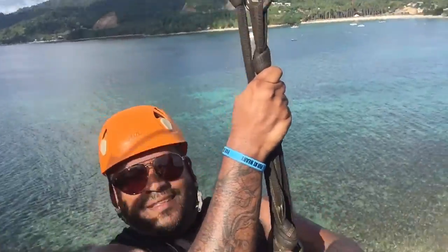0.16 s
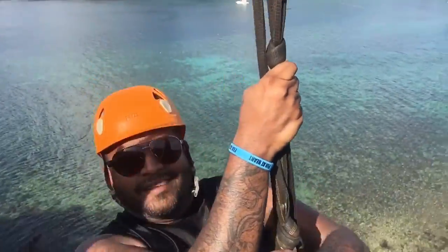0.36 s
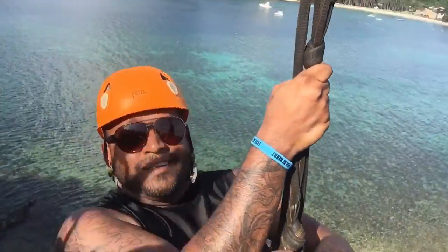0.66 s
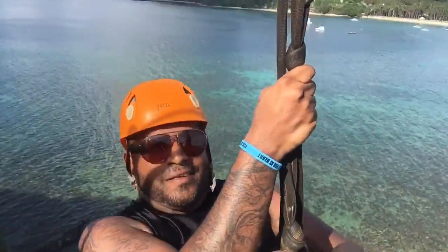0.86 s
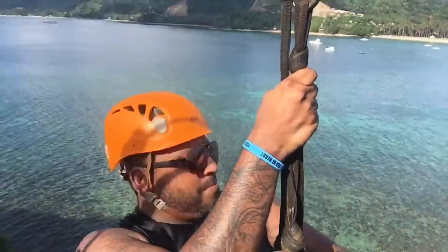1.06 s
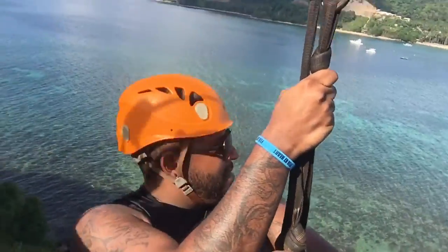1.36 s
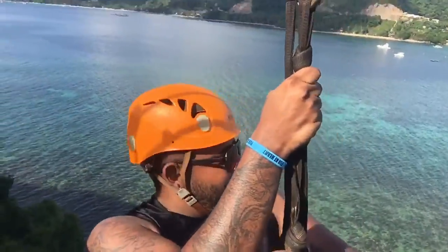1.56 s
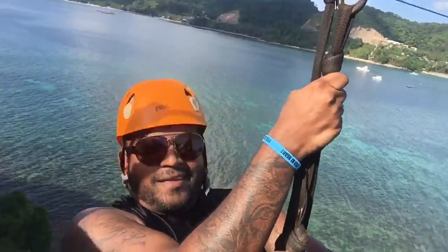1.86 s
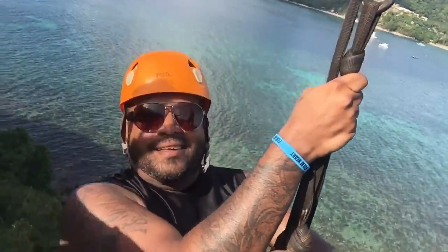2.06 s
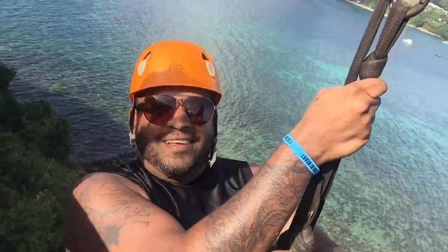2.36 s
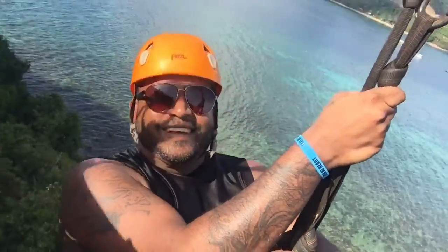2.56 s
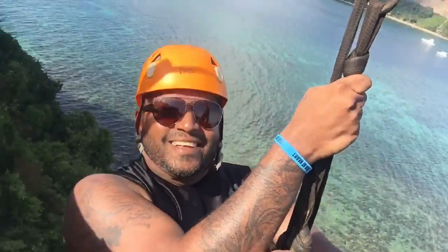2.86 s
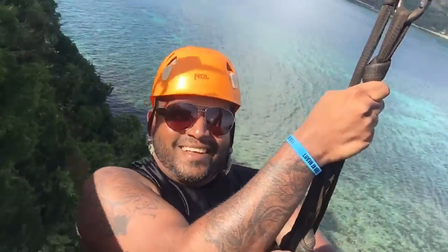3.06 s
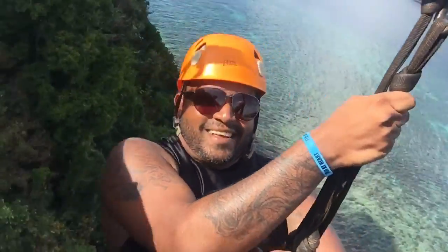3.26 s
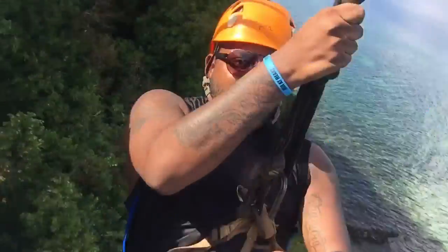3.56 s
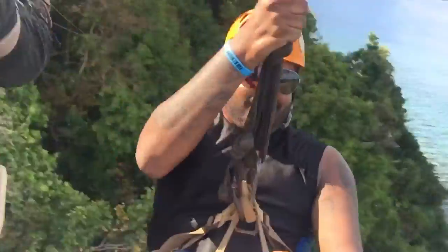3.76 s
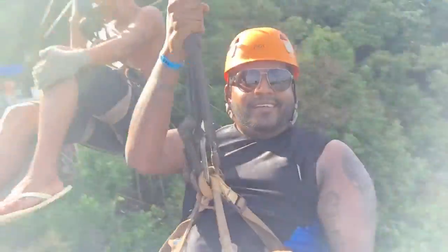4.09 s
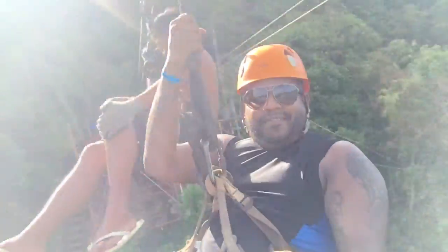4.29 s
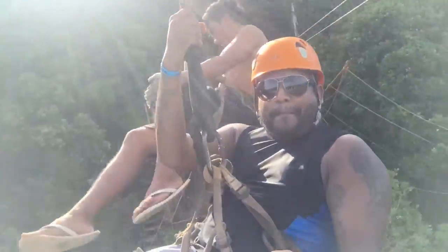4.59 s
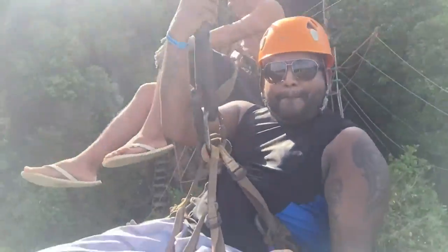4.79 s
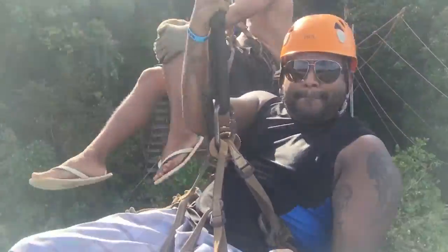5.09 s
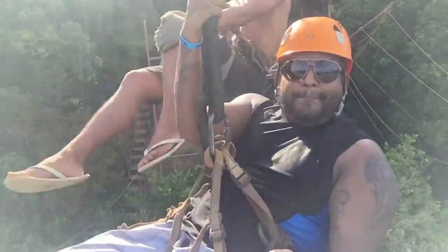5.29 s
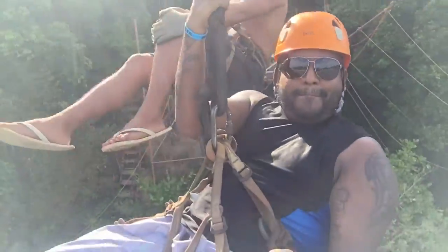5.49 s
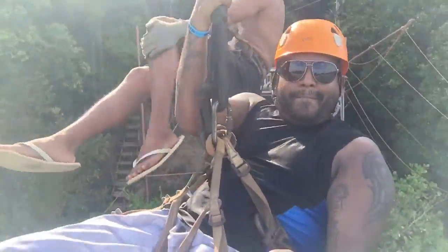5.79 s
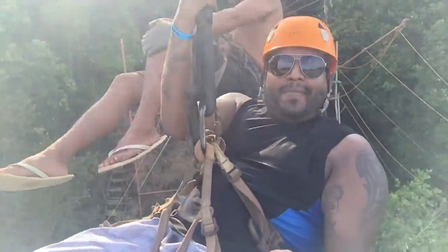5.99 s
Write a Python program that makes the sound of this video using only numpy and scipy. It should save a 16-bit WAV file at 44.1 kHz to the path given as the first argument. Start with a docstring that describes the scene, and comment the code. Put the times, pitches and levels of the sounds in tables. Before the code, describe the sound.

Close metallic whine and gritty hiss of zip line wheels running down a cable, swelling and dipping, then easing, under light wind buffeting.

```python
"""Zip line ride

A trolley runs down a twisted steel cable, heard from a rider below. Its wheels knock over each strand
and ring the pulley, over the gritty roar and hiss of steel on steel. The trolley slows; the cable
bounces, so the sound swells and dips about every 2/3 s. Near 4 s the riders swing round and the
sound softens. Light wind buffets the microphone."""
import sys
import numpy as np
from scipy import signal
from scipy.fft import rfft, irfft
from scipy.io import wavfile
from scipy.ndimage import uniform_filter1d, minimum_filter1d

SR = 44100
rng = np.random.default_rng(int(sys.argv[2]) if len(sys.argv) > 2 else 0)


def dump(signal):
    """Clip the signal to [-1, 1] and save it as 16-bit WAV at the path in sys.argv[1]."""
    limited = np.clip(np.atleast_2d(signal).T, -1, 1)
    pcm = np.round(limited * 32767).astype(np.int16)
    wavfile.write(sys.argv[1], SR, pcm)


N = 270581
TIME = np.arange(N) / SR

# wind on the microphone: (frequency [Hz], relative level [dB])
WIND_SPECTRUM = [(15, -37), (30, -26), (60, 4), (90, -7), (125, -6), (160, -3), (220, -1.5), (400, -2),
                 (600, -18.5), (1200, -23)]
# gust thumps: (time [s], level [dB], half-width [s], centre [Hz])
WIND_GUSTS = [(1.133, -50, .018, 150), (1.157, -45, 0.044, 68), (1.74, -48, 0.063, 62),
              (1.903, -52, .04, 110), (2.167, -49.5, 0.15, 250), (2.72, -50, .06, 62),
              (4.42, -52, 0.21, 60), (5.17, -47, .04, 75), (5.298, -44, 0.043, 80),
              (5.3, -49.5, 0.036, 160), (5.315, -47, 0.025, 270), (5.63, -51, .04, 60),
              (5.94, -48, .04, 60)]
# two low cable tones: (time [s], lower [dB], upper [dB])
CABLE_TONE_LEVELS = [(0, -59, -49.5), (2, -68, -51.5), (3.7, -57, -52), (4.5, -51.5, -46.5),
                     (5.87, -48.5, -49), (6.0, -48.5, -41)]
# hiss and roar, before and after the turn: (frequency [Hz], relative level [dB])
HISS_SPECTRUM = [(3500, -22.5), (4950, -3), (5250, 1.5), (5750, 0), (6050, -2), (6800, 2), (7600, -6.5),
                 (8200, -5.5), (9100, -6.5), (9600, -5), (10400, -11), (11400, -10), (13500, -17),
                 (15800, -17)]
HISS_TURNED_SPECTRUM = [(2650, -23.5), (4400, 3.5), (4950, -0.5), (5500, 1), (6600, 1), (7400, -4),
                        (8000, -3.5), (10000, -11.5), (11600, -16.5), (12600, -15), (15800, -21.5)]
ROAR_SPECTRUM = [(260, -60), (450, -26), (793, -18.5), (1000, -14), (1760, -2.5), (2500, -3.5),
                 (3020, -1.6), (3240, -2.5), (3500, -1.5), (4550, -21), (7700, -120)]
ROAR_TURNED_SPECTRUM = [(260, -36.5), (450, -18), (499, -20.5), (618, -18), (740, -14), (879, -16.5),
                        (1070, -9.5), (1270, -9.5), (1640, -8.5), (2000, -7), (2380, -6), (2660, 0.5),
                        (2950, -1), (3500, 1.5), (4550, -38.5), (7700, -120)]
# pulley modes: (frequency [Hz], base width [Hz], gain [dB], share of lean gain [ratio])
PULLEY_MODES = [(3440, 61, -8, 0), (3796, 172, 0.4, -1), (4239, 170, -1.7, 0.97), (4453, 250, -3.5, 1.15)]
# the pulley leans into the swing, damping its upper modes: (time [s], gain [dB])
LEAN_GAIN = [(0, 0.5), (2.5, 2), (3.3, 1.3), (3.75, -2), (4.3, -5), (6.14, 0)]
# riders swinging round: (time [s], turn [0-1])
RIDER_TURN = [(0, 0.071), (3.85, .1), (4.02, 0.44), (4.27, 0.82), (6.14, .85)]
# cable presses on the wheels, then goes light: (lightest moment [s], press [0-1], lift [0-1])
CABLE_BOUNCES = [(.42, .65, 0), (1.08, 0.45, 0.25), (1.73, .6, 0.27), (2.39, 0.47, 0.44),
                 (3.06, 0.46, 0.85), (3.72, 0.24, 1), (4.37, 0.6, 0.5), (5.06, 0.46, 0.72), (5.75, .5, 0.5)]
# slow levels: (time [s], pulley [dB], roar [dB], hiss [dB], hiss boost above 9 kHz [dB])
TROLLEY_LEVELS = [(0, -17.5, -21.5, -23, 0), (1.2, -17, -20.5, -23, 0.5), (1.55, -16, -20, -24.5, 2.5),
                  (1.85, -17, -20.5, -25, 4), (2.15, -17, -20, -23, 1), (3.1, -16.5, -19, -23.5, 2.5),
                  (3.5, -16, -18, -24.5, 4.5), (3.88, -19.5, -19.8, -24, 2.5), (4.1, -27, -23, -23.5, 1.5),
                  (4.4, -25.4, -25.5, -23.5, 0), (5.4, -26, -25, -23.5, 1), (6.14, -26.5, -26, -24.5, 1.5)]

START_STRANDS_PER_S, SLOWING_PER_S2 = 170, 2.9
PRESS_LEAD_S, PRESS_S, LIFT_S = 0.18, 0.12, 0.075
SURGE_LEAD_S, SURGE_S, SURGE_STRANDS_PER_S, LAG_STRANDS_PER_S = 0.12, 0.075, 13, 9
CHATTER_HZ = 22  # random wheel chatter


def amp(db):
    """Decibels to gain."""
    return 10 ** (np.asarray(db) / 20)


def unit_rms(x):
    """Scale to rms 1 overall."""
    return x / np.sqrt(np.mean(x ** 2) + 1e-20)


def levelled(x, size=4000):
    """Scale to rms 1 over a sliding window; fine grain stays."""
    return x / np.sqrt(abs(uniform_filter1d(x ** 2, size)) + 1e-12)


def curve(rows, column=1):
    """Time-table column at every sample."""
    rows = np.asarray(rows)
    return np.interp(TIME, rows[:, 0], rows[:, column])


def swell(at_s, half_width_s):
    """Gaussian bump, peak 1."""
    return np.exp(-((TIME - at_s) / half_width_s) ** 2)


def wander(hz):
    """Smooth noise up to about hz, rms 1."""
    f = np.fft.rfftfreq(N, 1 / SR)
    return unit_rms(irfft(rfft(rng.standard_normal(N)) * np.exp(-(f / hz) ** 2), N))


def colour(x, spectrum, size=4096):
    """Causal filter shaped by a spectrum table; output rms 1."""
    hz, db = np.transpose(spectrum)
    f = abs(np.fft.fftfreq(size, 1 / SR))
    log_gain = np.log(amp(np.interp(np.log(f + 1), np.log(hz + 1), db)))
    response = np.fft.ifft(np.exp(np.conj(signal.hilbert(log_gain)))).real
    return unit_rms(signal.oaconvolve(x, response[:size // 2])[:N])


def resonate(x, hz, width_hz):
    """One mode, gain 1 at centre."""
    return signal.lfilter(*signal.iirpeak(hz, hz / width_hz, SR), x)


def fuzzy_tone(x, hz, width_hz):
    """Two passes through one mode; output rms 1."""
    return unit_rms(resonate(resonate(x, hz, width_hz), hz, width_hz))


def shimmer(x, depth_db, frames, bins, size=512):
    """Reflections off the swaying riders lift and lower patches of the spectrum."""
    window = dict(nperseg=size, noverlap=size - size // 4)
    spectra = signal.stft(x, **window)[2]
    patches = rng.standard_normal(spectra.shape[::-1]).T
    for _ in range(2):
        patches = uniform_filter1d(uniform_filter1d(patches, frames, axis=1), bins, axis=0)
    gain = unit_rms(amp(depth_db * unit_rms(patches)))
    return signal.istft(spectra * gain, **window)[1][:N]


def turning(before, after):
    """Constant-power crossfade as the riders swing round."""
    turn = np.clip(curve(RIDER_TURN), 0, 1)
    correlation = np.mean(unit_rms(before) * unit_rms(after))
    power = 1 - 2 * turn * (1 - turn) * (1 - correlation)
    return ((1 - turn) * before + turn * after) / np.sqrt(power)


def bounce_db(press_db, lift_db):
    """Level change per bounce: add press_db under a full press, subtract lift_db in a full lift."""
    return sum(press_db * press * swell(at_s - PRESS_LEAD_S, PRESS_S)
               - lift_db * lift * swell(at_s, LIFT_S) for at_s, press, lift in CABLE_BOUNCES)


def strand_rate_hz():
    """Steady slowing, with a surge before each lift and a lag during it."""
    sway = sum(SURGE_STRANDS_PER_S * swell(at_s - SURGE_LEAD_S, SURGE_S)
               - LAG_STRANDS_PER_S * swell(at_s, LIFT_S) for at_s, _, _ in CABLE_BOUNCES)
    return START_STRANDS_PER_S - SLOWING_PER_S2 * TIME + sway


def knocks(strands, jitter_s, spread_db):
    """One impulse per strand, uneven in timing and force."""
    at = np.flatnonzero(np.diff(np.floor(strands)))
    late, force = rng.standard_normal((len(at), 2)).T
    at = np.clip(at + (late * jitter_s * SR).astype(int), 0, N - 1)
    impulses = np.zeros(N)
    impulses[at] = amp(spread_db * np.minimum(force, 1.5))
    return unit_rms(impulses)


def grit(strands, per_s, spread_db, floor, fade_strands):
    """Tiny wire contacts, strongest as a wheel lands on a strand."""
    grains = (rng.random(N) < per_s / SR) * rng.choice([-1, 1], N)
    force = amp(spread_db * np.minimum(rng.standard_normal(N), 2.5))
    return unit_rms(grains * force * (floor + np.exp(-(strands % 1) / fade_strands)))


def wind():
    """Lumpy low rush and gust thumps on the microphone, which passes no deep bass."""
    rush = amp(-48.5 + wander(12)) * colour(rng.standard_normal(N), WIND_SPECTRUM)
    for at_s, db, half_width_s, hz in WIND_GUSTS:
        thump = fuzzy_tone(rng.standard_normal(N), hz, width_hz=60)
        rush += amp(db) * swell(at_s, half_width_s) * thump
    return signal.sosfilt(signal.butter(5, 35, "high", fs=SR, output="sos"), rush)


def cable(strands):
    """Faint hum at the strand rate, plus the cable's two low tones."""
    phase = 2 * np.pi * strands
    hum = amp(-57.5 + 3.8 * wander(14)) * unit_rms(np.sin(phase) + amp(-6) * np.sin(2 * phase))
    lower = unit_rms(resonate(rng.standard_normal(N), hz=438, width_hz=27))
    upper = fuzzy_tone(rng.standard_normal(N), hz=628, width_hz=140)
    return hum + amp(curve(CABLE_TONE_LEVELS, 1)) * lower + amp(curve(CABLE_TONE_LEVELS, 2)) * upper


def flange(strands, peak_s=3.54, peak_db=-23, rise_db_per_s=60, fall_db_per_s=41):
    """A wheel flange rubs the cable once as the trolley leans: a fuzzy high note."""
    drive = grit(strands, per_s=3000, spread_db=7, floor=0.61, fade_strands=0.3)
    below_db = np.maximum(rise_db_per_s * (peak_s - TIME), fall_db_per_s * (TIME - peak_s))
    return amp(peak_db - below_db) * fuzzy_tone(drive, hz=5660, width_hz=330)


def hiss(strands):
    """Fine crackle of steel on steel, with a sharp tick at some strands."""
    ticks = amp(-13.5) * knocks(strands, jitter_s=0.0009, spread_db=10)
    drive = grit(strands, per_s=14000, spread_db=5, floor=1.02, fade_strands=0.46) + ticks
    crackle = levelled(turning(colour(drive, HISS_SPECTRUM), colour(drive, HISS_TURNED_SPECTRUM)))
    sizzle = signal.sosfiltfilt(signal.butter(3, 9000, "high", fs=SR, output="sos"), crackle)
    sizzle_db = curve(TROLLEY_LEVELS, 4) + bounce_db(press_db=-2, lift_db=1.8) + 0.5 * wander(90)
    crackle += (amp(sizzle_db) - 1) * sizzle
    flutter_db = 0.65 * wander(120) + 0.75 * wander(CHATTER_HZ)
    level_db = curve(TROLLEY_LEVELS, 3) + bounce_db(press_db=3, lift_db=4.5) + flutter_db
    return amp(level_db) * shimmer(crackle, depth_db=1.13, frames=9, bins=5)


def roar(strands):
    """The wheels shake the cable: a dense, slightly pulsing rush."""
    drive = grit(strands, per_s=7000, spread_db=2.5, floor=1.7, fade_strands=0.53)
    drive += amp(-12) * knocks(strands, jitter_s=0.00084, spread_db=8)
    rush = turning(colour(drive, ROAR_SPECTRUM), colour(drive, ROAR_TURNED_SPECTRUM))
    level_db = curve(TROLLEY_LEVELS, 2) + bounce_db(press_db=2.5, lift_db=3) + 0.52 * wander(CHATTER_HZ)
    return amp(level_db) * shimmer(rush, depth_db=0.79, frames=15, bins=3)


def pulley_ring(drive, width_scale):
    """Pulley modes in alternating polarity; the side plates radiate one band only."""
    lean_db = curve(LEAN_GAIN)
    modes = sum((-1) ** k * amp(db + share * lean_db) * resonate(drive, hz, width_hz * width_scale)
                for k, (hz, width_hz, db, share) in enumerate(PULLEY_MODES))
    plates = signal.butter(5, [2900, 4620], "band", fs=SR, output="sos")
    return levelled(signal.sosfilt(plates, modes))


def pulley(strands):
    """Strand knocks and grit ring the wheels and side plates; the turn blurs the knocks."""
    hard = knocks(strands, jitter_s=0.0004, spread_db=4.5)
    hard += amp(0.3) * grit(strands, per_s=6000, spread_db=3.5, floor=0.44, fade_strands=0.52)
    soft = amp(-7) * knocks(strands, jitter_s=0.0008, spread_db=16)
    soft += grit(strands, per_s=4000, spread_db=4, floor=1.5, fade_strands=0.3)
    ring = turning(pulley_ring(hard, width_scale=1), pulley_ring(soft, width_scale=3.5))
    level_db = curve(TROLLEY_LEVELS, 1) + bounce_db(press_db=2, lift_db=2.5) + 0.9 * wander(CHATTER_HZ)
    return amp(level_db) * shimmer(ring, depth_db=1.07, frames=22, bins=3)


def scene():
    """Mono mix; all trolley sounds follow one count of passing strands."""
    strands = np.cumsum(strand_rate_hz() * (1 + 0.012 * wander(30))) / SR
    trolley = pulley(strands) + roar(strands) + hiss(strands) + flange(strands)
    return (trolley + cable(strands) + wind())[None]


def record(dry):
    """Fast peak limiter, then a 15.8 kHz low-pass."""
    max_gain = np.minimum(1, 0.97 / (abs(dry) + 1e-9))
    limited = dry * uniform_filter1d(minimum_filter1d(max_gain, size=61), size=61)
    low_pass = signal.firwin(1023, 15800, window=("kaiser", 9), fs=SR)
    return signal.oaconvolve(limited, low_pass[None], "same")


dry = scene()
out = record(dry)
dump(out)
```